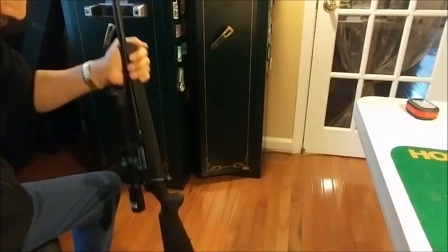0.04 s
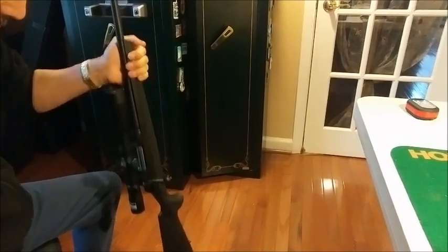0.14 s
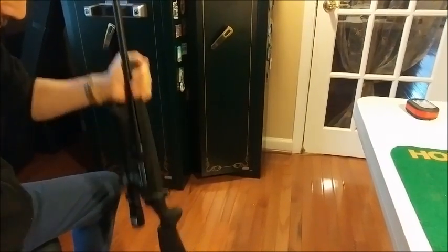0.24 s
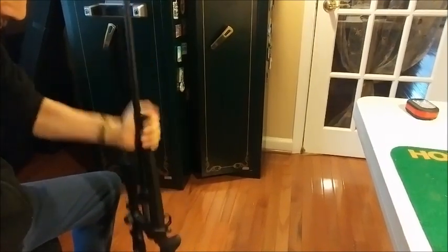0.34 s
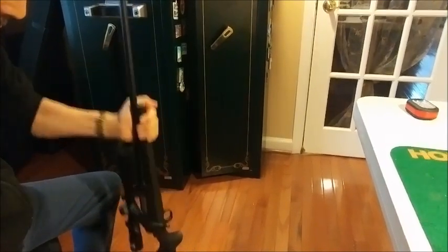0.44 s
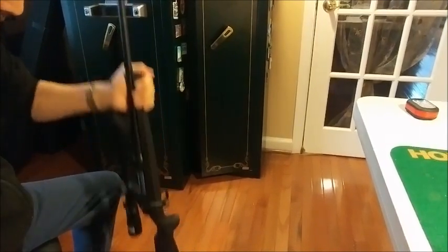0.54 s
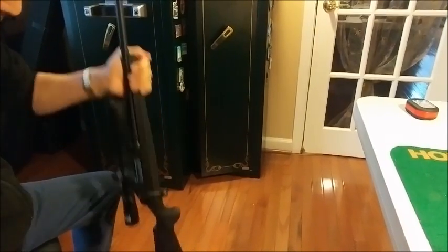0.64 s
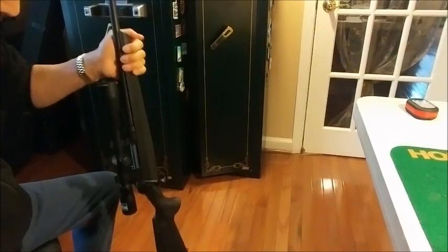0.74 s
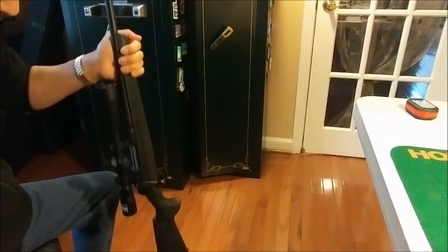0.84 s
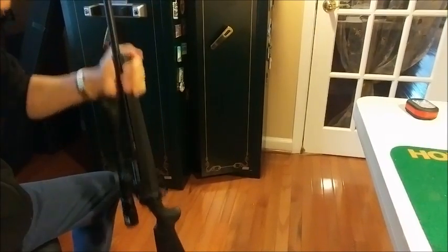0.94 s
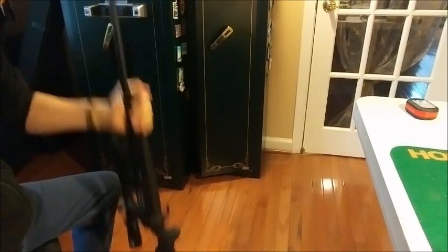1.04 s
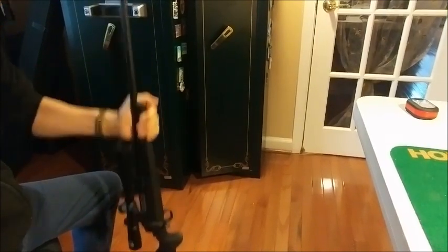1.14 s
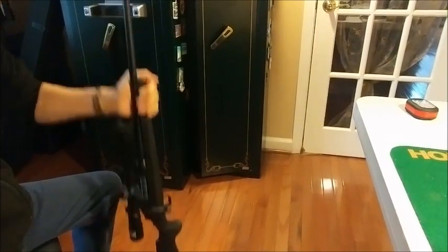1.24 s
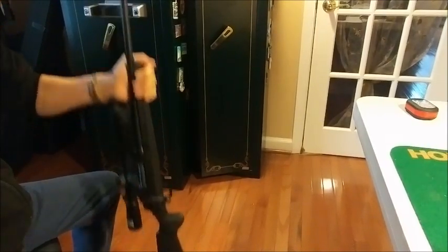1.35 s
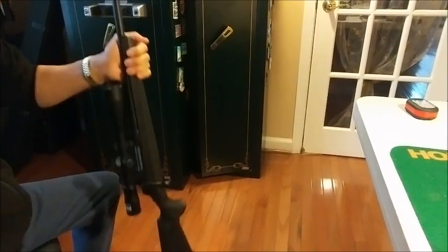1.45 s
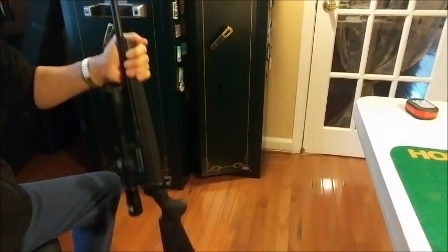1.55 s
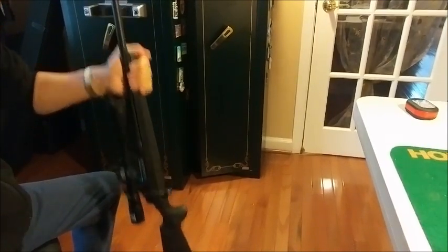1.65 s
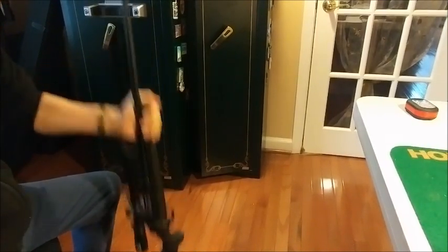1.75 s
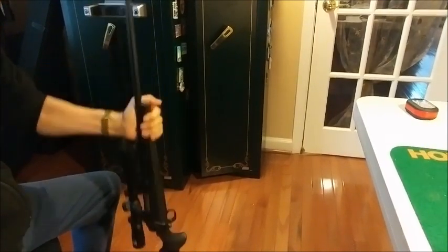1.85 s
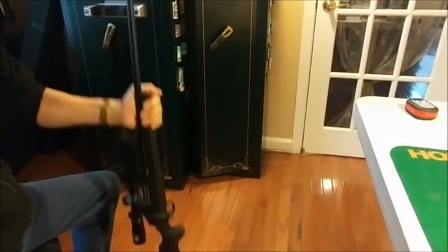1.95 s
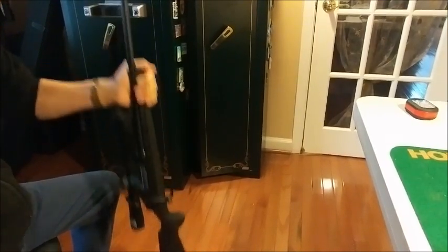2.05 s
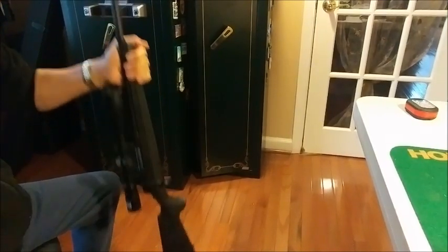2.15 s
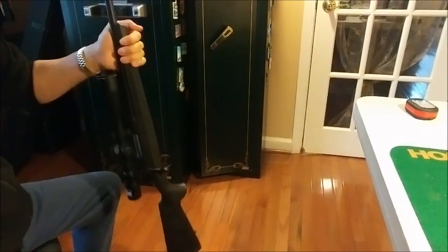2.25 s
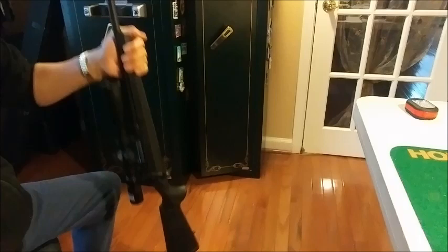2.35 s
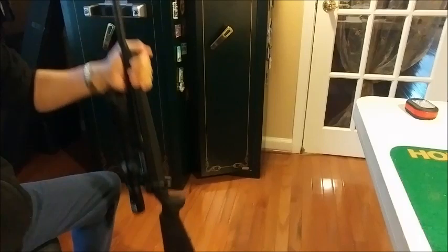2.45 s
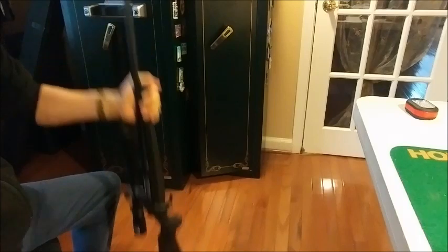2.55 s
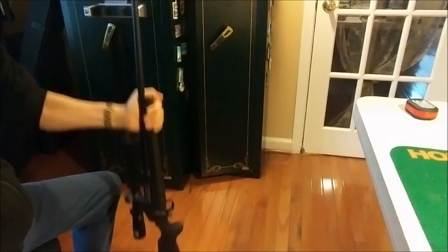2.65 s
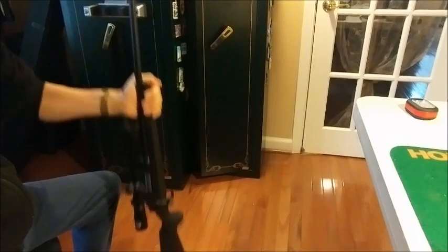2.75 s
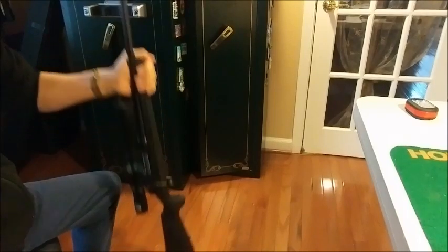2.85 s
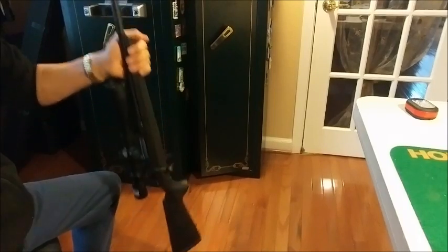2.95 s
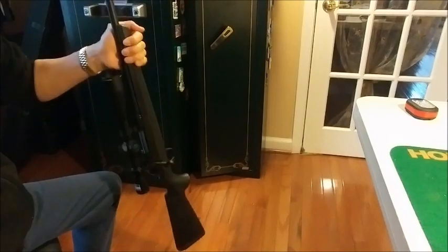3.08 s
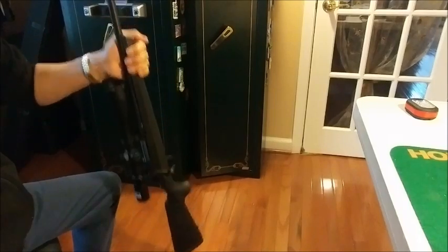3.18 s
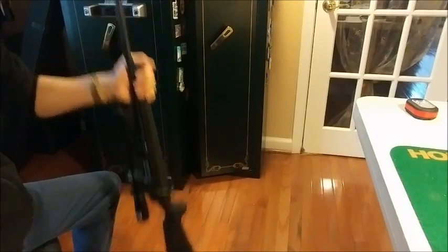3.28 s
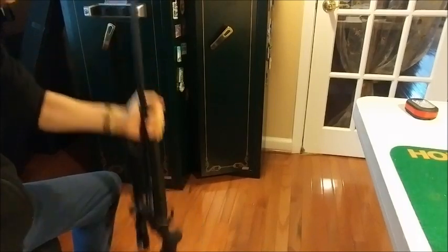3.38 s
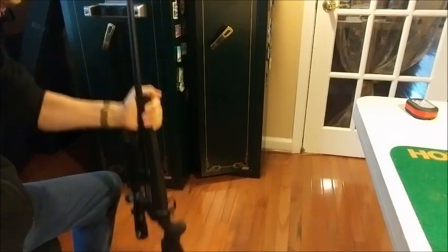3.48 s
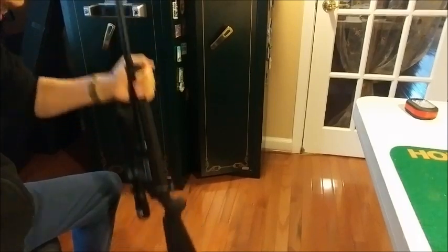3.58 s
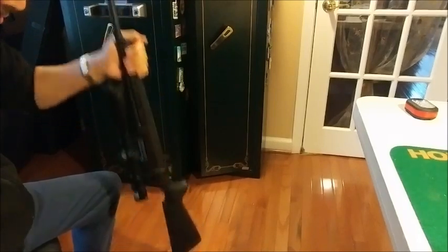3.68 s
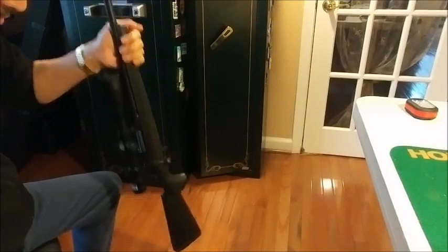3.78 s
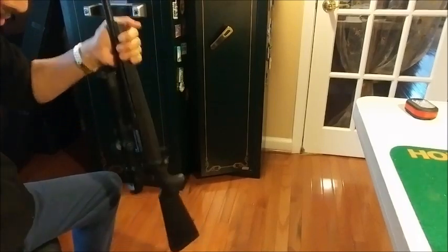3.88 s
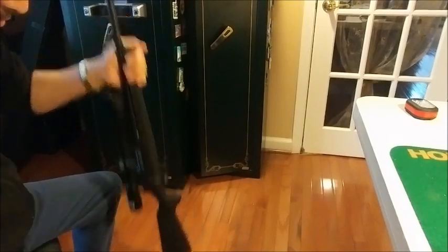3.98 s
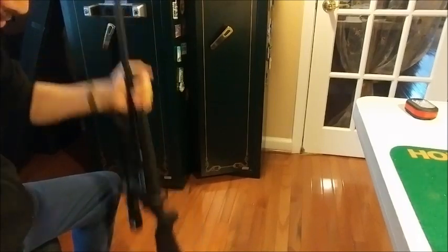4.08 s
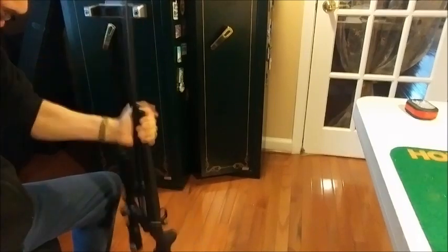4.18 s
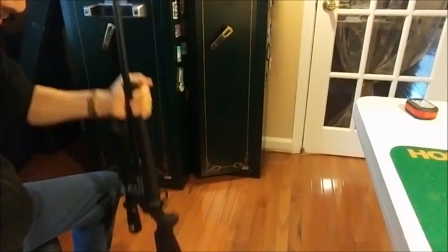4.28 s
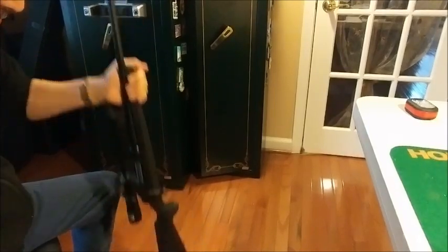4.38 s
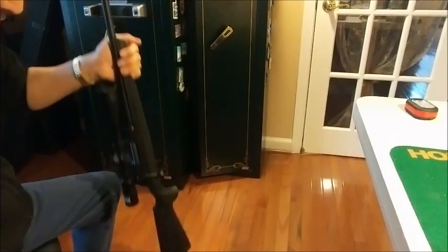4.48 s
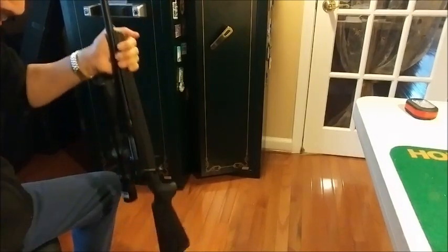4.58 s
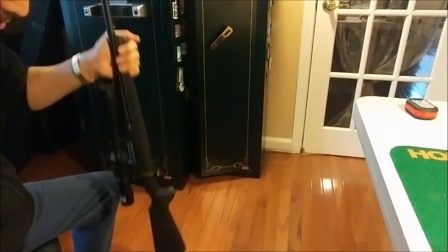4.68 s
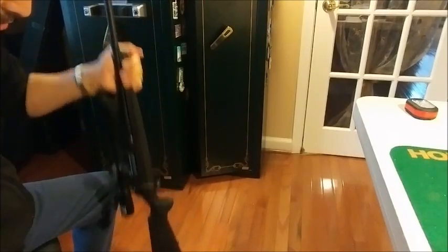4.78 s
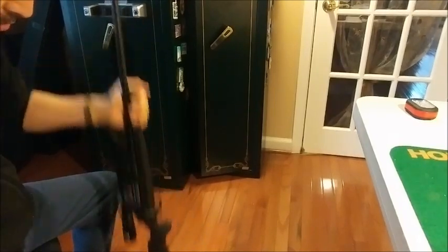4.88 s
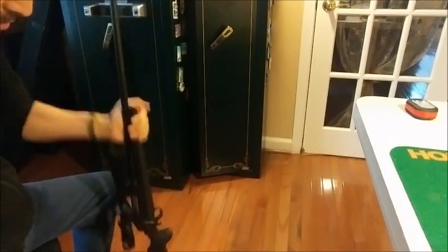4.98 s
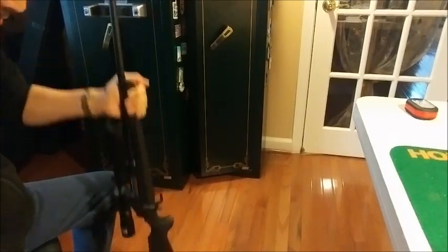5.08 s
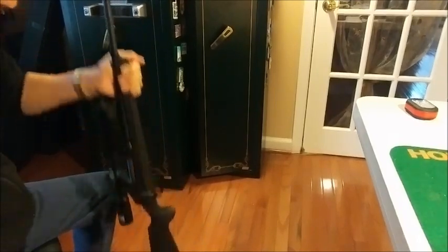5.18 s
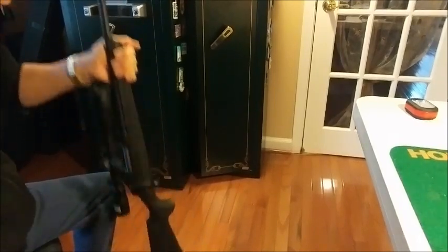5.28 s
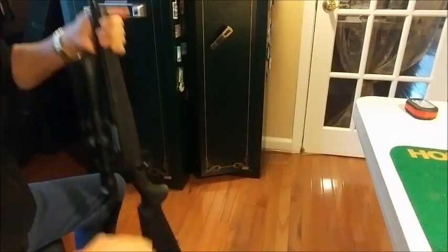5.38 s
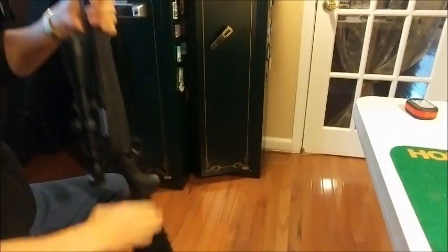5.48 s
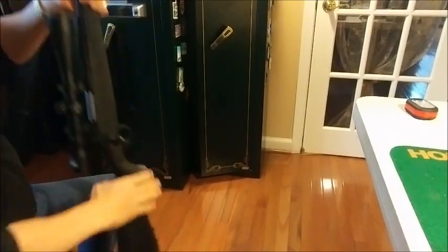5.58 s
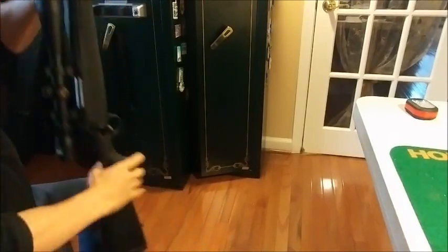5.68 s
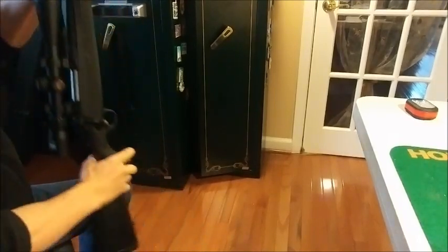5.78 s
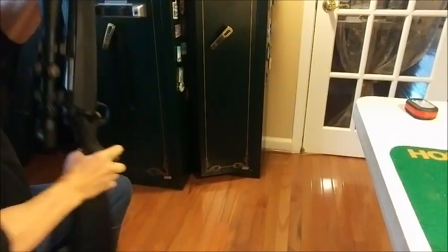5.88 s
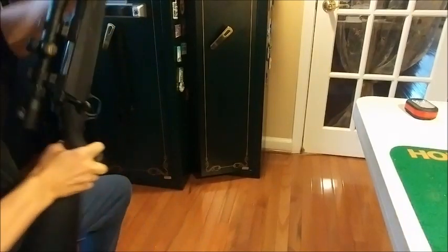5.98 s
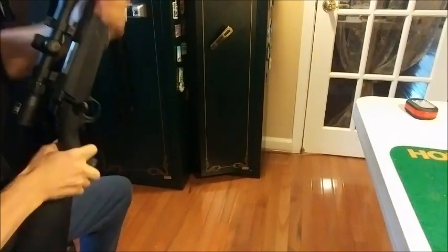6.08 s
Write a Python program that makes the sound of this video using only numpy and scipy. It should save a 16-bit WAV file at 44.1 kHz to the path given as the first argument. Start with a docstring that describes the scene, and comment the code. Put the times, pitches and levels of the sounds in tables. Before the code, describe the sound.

In a small quiet room, the tail of an earlier blow fades, then a rifle butt strikes the hardwood floor seven times, roughly every three quarters of a second. Each dull knock makes the floor boom and loose metal clatter for about a tenth of a second. After the last, brief sliding friction and a faint hand slap. Close microphone, louder on the left, low rumble and slight hiss.

```python
"""In a small room with steel safes, a rifle is banged butt first on a hardwood floor seven times.
Each blow is a dull knock of noise and filtered impulse; summed decaying sines make the floor and room boom,
and a train of bounces sets loose metal clattering for about a tenth of a second. Before the first full blow
an earlier one is dying away. At the end the rifle slides through the hand and is caught with a slap of
short modes. The microphone is near and hears more at its left port, over a low room tone and hiss."""
import sys
import numpy as np
from scipy import signal
from scipy.fft import rfft, irfft
from scipy.io import wavfile

SR = 44100
rng = np.random.default_rng(int(sys.argv[2]) if len(sys.argv) > 2 else 0)


def to_wav(sig):
    """Store sig (one row per channel, or 1-D mono) as 16-bit WAV at the path in sys.argv[1].

    Samples outside -1..1 are clipped; the rate is SR.
    """
    pcm = np.clip(np.atleast_2d(sig), -1, 1) * 32767
    pcm = np.round(pcm).astype(np.int16)
    wavfile.write(sys.argv[1], SR, pcm.T)  # frames by channels


N = 270200
T = np.arange(SR) / SR  # one second of time, s
FREQS = np.arange(SR // 2 + 1)  # Hz

# blows of the butt, the first already dying away; the knock is set by how squarely the butt lands:
# [t/s, strength/dB, knock/dB]
BLOW_TIMES = [(-.27, 1.5, -0.5), (.417, 0.03, -4), (1.137, 1.9, -4), (1.847, 1.5, -6.5), (2.652, -0.7, -9),
              (3.438, -1.85, -5.5), (4.203, 2.23, -6), (4.978, 3, -4.5)]


def undb(db):
    """Decibels to gain."""
    return 10 ** (np.asarray(db) / 20)


def along(points, hz):
    """Read (f/Hz, value) points on a log-frequency axis."""
    f, value = np.transpose(points)
    return np.interp(np.log(hz + 1), np.log(f), value)


def convolve(x, response):
    """Pass a sound through a response, keeping its length."""
    x = np.atleast_2d(x)
    return signal.fftconvolve(x, np.atleast_2d(response), axes=-1)[:, :x.shape[-1]]


def colour(x, points):
    """Equalise with a minimum-phase filter of the given (f/Hz, level/dB) response."""
    cepstrum = irfft(np.log(undb(along(points, FREQS))))
    # folding the cepstrum onto positive time makes the filter causal
    cepstrum[1:SR // 2] *= 2
    cepstrum[SR // 2 + 1:] = 0
    response = irfft(np.exp(rfft(cepstrum)))[:8192]
    return convolve(x, response)


def burst(x, db):
    """Scale a short sound to the level it would have if spread over a tenth of a second."""
    spread_rms = np.sqrt(np.mean(x ** 2) * x.shape[-1] / (SR / 10))
    return x * undb(db) / spread_rms


def add(out, s, x):
    """Mix a sound in at a time in seconds; it may overhang either end."""
    start = int(s * SR)
    lo, hi = max(start, 0), min(start + x.shape[-1], N)
    out[:, lo:hi] += x[..., lo - start:hi - start]


def ring(modes):
    """Free decay of struck modes (f/Hz, level/dB, t60/s), each an exponentially fading sine."""
    return sum(undb(db - 60 * T / t60) * np.sin(2 * np.pi * hz * T) for hz, db, t60 in modes)


def contact(decay_s):
    """One gritty touch of two hard surfaces: fading noise of unit energy."""
    grit = rng.standard_normal(SR) * np.exp(-T / decay_s)
    return grit / np.linalg.norm(grit)


def diffuse(size, alike_hz=400):
    """Noise from all around at two close ports: alike in the bass, unrelated in the treble."""
    mid, side = rfft(rng.standard_normal((2, size)))
    hz = np.arange(len(mid)) * SR / size
    alike = 1 / (1 + (hz / alike_hz) ** 2)
    mid = mid * np.sqrt(1 + alike)
    side = side * np.sqrt(1 - alike)
    return irfft(np.array([mid + side, mid - side]), size)


def room(direct_db, build_s=0.00065):
    """Path from one spot to the microphone: the direct sound, then a tail that dulls as it fades."""
    # reverberation of the room: [f/Hz, t60/s]
    reverb = [(150, .55), (500, 0.52), (1000, 0.42), (2000, 0.43), (5000, 0.36), (8000, 0.29),
              (15000, 0.14)]
    left_lag_s = .00008
    hz, s, cells = signal.stft(diffuse(size=SR), SR, nperseg=256)
    fade_db = -60 * s / along(reverb, hz)[:, None]
    tail = signal.istft(cells * undb(fade_db), SR)[1][:, :SR]
    tail = tail * (1 - np.exp(-T / build_s))
    # the direct sound comes 8 samples in, a little later still at the left port
    lags = np.array([[left_lag_s * SR], [0]]) + 8
    direct = np.sinc(T * SR - lags)
    return burst(tail, 0) + burst(direct, direct_db)


def room_tone(hum_db=-60, lift_db=-61, lift_after_s=0.65, lift_half_s=0.034):
    """A low steady rumble, and a soft flutter of clothing as the arm comes up after each blow."""
    # spectrum of the rumble: [f/Hz, level per Hz/dB]
    hum_colour = [(15, -43.5), (25, -4.5), (55, -4), (79, -21), (104, -7), (173, -7), (289, -14),
                  (410, -13.5), (445, -19), (495, -17), (895, -26.5), (1300, -28.5), (1850, -29.5),
                  (15500, -49.5)]
    flutter_colour = [(40, -7.5), (120, 9.5), (350, -18.5), (800, -10.0), (4000, -38)]
    t = np.arange(N) / SR
    hum = colour(diffuse(size=N), hum_colour)
    lift = sum(np.exp(-((t - blow[0] - lift_after_s) / lift_half_s) ** 2) for blow in BLOW_TIMES)
    flutter = colour(diffuse(size=N), flutter_colour)
    tone = undb(hum_db) * hum / hum.std() + undb(lift_db) * lift * flutter / flutter.std()
    # the tone is thinned below 46 Hz
    return signal.sosfilt(signal.butter(8, 46, "high", fs=SR, output="sos"), tone)


def handling(grain_db=0.9, slap_db=-10, catch_s=6.091, catch_db=-50.5):
    """Cloth and skin slide along the stock as swells of grainy noise; the other hand slaps shut on it."""
    # sleeve and palm sliding on the stock: [t/s, half length/s, level/dB]
    slides = [(5.345, 0.072, -46.5), (5.762, 0.036, -65), (5.887, 0.062, -63.5), (6.12, 0.083, -49.5)]
    # colour of the sliding: [f/Hz, level/dB]
    slide_colour = [(200, 6), (1000, 2.5), (3000, 1), (6000, 1), (7800, 8.5), (9000, 10.5), (16000, -9)]
    # the stock slapped by the palm: [f/Hz, level/dB, t60/s]
    palm_modes = [(1143, -6, 0.15), (1394, -0.5, .12), (1710, 4, 0.048), (1886, 9, 0.095), (1980, -13, .06),
                  (2280, -22, .06)]
    t = np.arange(N) / SR
    speed = sum(undb(db) * np.exp(-((t - s) / half) ** 2) for s, half, db in slides)
    # the grain jumps in level every 200 samples
    steps = np.repeat(rng.standard_normal(N // 200 + 1), 200)[:N]
    rub = colour(diffuse(size=N) * undb(grain_db * steps), slide_colour)
    out = speed * rub / rub.std()
    slap = burst(ring(palm_modes), 0) + burst(contact(decay_s=0.00087), slap_db)
    add(out, catch_s, burst(convolve(slap, room(direct_db=-1.0)), catch_db))
    return out


def rattle(count=4, bounces=3, rate=300, scatter_db=4.5, chatter_db=3, jitter_s=.0006, uneven_db=1):
    """Impacts of loose parts thrown up by the jolt: each lands and bounces ever lower, amid dense chatter."""
    # the light parts land first and softly; the heavy one flies longest and lands hard
    shortest_flight_s, longest_flight_s = .018, .0372
    light_part_db, heavy_part_db = -10, 1
    # each bounce lasts this share of the flight before it, and is weaker
    rebound, bounce_loss_db = .44, 3.5
    # the chatter swells until the parts are down, then dies ever faster (60 dB in settle_s)
    swell_s, swell_power, settle_s, settle_power = 0.041, 1.2, 0.17, 1.5

    swell = np.minimum(T / swell_s, 1) ** swell_power
    fade_db = -60 * (np.maximum(T - swell_s, 0) / settle_s) ** settle_power
    size = swell * undb(fade_db + scatter_db * rng.standard_normal((count, SR)))
    # rate is taps per second over all the parts together
    taps = size * (rng.random((count, SR)) < rate / SR / count)
    taps *= undb(chatter_db) / np.linalg.norm(taps)
    for part, flight in enumerate(np.linspace(shortest_flight_s, longest_flight_s, count)):
        first_db = heavy_part_db if part == count - 1 else light_part_db
        s = 0
        for k, (late, hard) in enumerate(rng.standard_normal((bounces, 2))):
            s += flight * rebound ** k
            landing_db = first_db - k * bounce_loss_db + uneven_db * hard
            taps[part, int(abs(s + jitter_s * late) * SR)] += undb(landing_db)
    return taps


def gritty(taps, decay_s=0.0011):
    """Every impact grates for an instant: noise shaped by the fading energy of the taps."""
    energy = convolve(taps ** 2, np.exp(-2 * T / decay_s))
    return np.sqrt(np.abs(energy)) * rng.standard_normal(energy.shape)


def floor_boom(rise_s=0.056):
    """The heaving floor takes a few cycles to fill the room's low modes, which then ring down."""
    # low modes of floor and room: [f/Hz, level/dB, t60/s]
    boom_modes = [(41.4, -11.5, 0.33), (50.6, -17, 0.66), (58.78, 5, 0.33), (73.86, -8, 0.39),
                  (91.94, -11, 0.4), (108.84, -10.5, 0.45), (120.3, 10, 0.11), (139.4, -20, 0.49),
                  (162.4, -1.2, 0.24), (184.9, -8, 0.3), (209.5, -8.5, 0.26), (239.8, -17, 0.37),
                  (258, 0.5, 0.13)]
    # neighbouring modes swing against each other
    swinging = ring(boom_modes[::2]) - ring(boom_modes[1::2])
    return swinging * (1 - np.exp(-T / rise_s)) ** 2


def butt_response(stock_db=-7):
    """Path of the knock: the coloured room, plus the ringing of the stock and the boards under it."""
    # the butt on the boards: [f/Hz, level/dB]
    knock_colour = [(150, 2.5), (330, -6), (480, 0.5), (590, 0), (780, -2.5), (900, -4), (1300, -5.5),
                    (3000, -14.5), (5000, -24.5), (7600, -17.5), (16000, -26.5)]
    # stock and boards under the butt: [f/Hz, level/dB, t60/s]
    stock_modes = [(248, -9.5, 0.023), (454, -9.5, 0.58), (547.5, 1, 0.41), (578, 10, 0.19),
                   (728, -6.5, 0.13), (817, -4.5, 0.061)]
    return burst(colour(room(direct_db=-17.5), knock_colour), 0) + burst(ring(stock_modes), stock_db)


def steel_response(wet_db=-5):
    """Ringing modes of the steel, heard dry and through the room."""
    # ringing steel: [f/Hz, level/dB, t60/s]
    steel_modes = [(987, -1, .22), (1012, 1, .08), (1042, 3, .13), (1062, -2, .08), (1098, -3, .16),
                   (1179, -5, .15), (1610, -4, .1), (1663, -3, .13), (1910, -4, .13), (2045, -6, .14),
                   (2460, -10, .1), (3120, -10, .1)]
    steel = ring(steel_modes)
    return burst(steel, 0) + burst(convolve(steel, room(direct_db=-13.5)), wet_db)


def knock(path, seat_s=.003, touch_db=-15, grind_db=1.0, grind_s=0.026):
    """The butt pad touches, seats hard on the boards, then grinds dully against them as the stock flexes."""
    push = undb(touch_db) * contact(decay_s=0.00049)
    push[int(seat_s * SR)] += 1
    grind_colour = [(300, -6.5), (600, 1.0), (900, -1.5), (2000, -11), (6000, -27.5)]
    grind = colour(contact(decay_s=grind_s), grind_colour)
    return convolve(push + undb(grind_db) * grind, path)


def blows(count=4, knock_db=-19.5, clatter_db=-16, steel_db=-23.5, steel_from_s=0.039, boards_db=-30):
    """Each blow knocks the boards, swells the low modes and shakes the loose metal."""
    # colour of the clatter: [f/Hz, level/dB]
    clatter_colour = [(200, -13.5), (400, -7), (750, -12.5), (1350, -0.5), (1660, 3), (1780, 2), (1920, 4),
                      (2200, 0.5), (3100, 2.5), (4000, -2), (5600, -3), (6600, -3), (7000, -4), (7600, 0)]
    board_colour = [(70, -18.5), (130, 6.5), (280, -3), (420, -7.0), (700, -14.5), (1500, -37.5)]
    # the floor gives less than the metal: dB of heave per dB of strength
    heave_per_db = .4
    out = np.zeros((2, N))
    boom = floor_boom()
    butt_path = butt_response()
    part_paths = [colour(room(direct_db=-5), clatter_colour) for _ in range(count)]
    board_path = colour(room(direct_db=-14), board_colour)
    steel_path = steel_response()
    for s, strength_db, hit_db in BLOW_TIMES:
        heave_db = heave_per_db * strength_db
        impacts = gritty(rattle(count=count))
        all_impacts = impacts.sum(axis=0)
        clatter = sum(convolve(part, path) for part, path in zip(impacts, part_paths))
        # the steel rings fully once the heaviest part has come down
        ringing = convolve(all_impacts * np.where(T > steel_from_s, 1, .5), steel_path)
        # the landings also drum on the boards
        drumming = convolve(all_impacts, board_path)
        add(out, s, boom * undb(heave_db))
        add(out, s, burst(knock(butt_path), knock_db + hit_db))
        add(out, s, burst(clatter, clatter_db + strength_db))
        add(out, s, burst(ringing, steel_db + strength_db))
        add(out, s, burst(drumming, boards_db + heave_db))
    return out


def scene():
    """Blows and handling over the room tone, louder at the left port."""
    # how much louder the left port hears, split evenly between the ports: [f/Hz, level/dB]
    left_excess = [(60, 4.4), (180, 4.1), (350, 5), (700, 4.3), (1400, 6.2), (2800, 4.9), (4500, 6.5),
                   (6800, 9), (8600, .5), (13500, 3.6)]
    near = room_tone() + handling() + blows()
    left = colour(near[0], [(hz, db / 2) for hz, db in left_excess])
    right = colour(near[1], [(hz, -db / 2) for hz, db in left_excess])
    return np.vstack([left, right])


def record(dry):
    """The microphone rounds peaks near full scale, colours the treble, adds its hiss and cuts the top."""
    # the microphone's treble, with a deep notch: [f/Hz, level/dB]
    mic_colour = [(7900, -1.5), (8500, -5.5), (9400, -20.5), (9800, -46.5), (10500, -45), (11500, -34.5),
                  (12500, -21), (14200, -20), (15700, -24)]
    hiss_db, top_hz = -77, 15700
    rounded = dry / (1 + dry ** 8) ** (1 / 8)
    heard = colour(rounded, mic_colour) + undb(hiss_db) * rng.standard_normal(dry.shape)
    return signal.sosfilt(signal.ellip(10, .2, 80, top_hz, fs=SR, output="sos"), heard)


dry = scene()
out = record(dry)
to_wav(out)
```